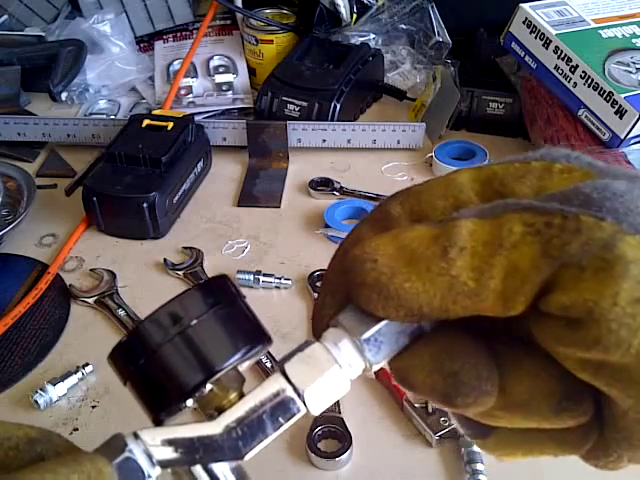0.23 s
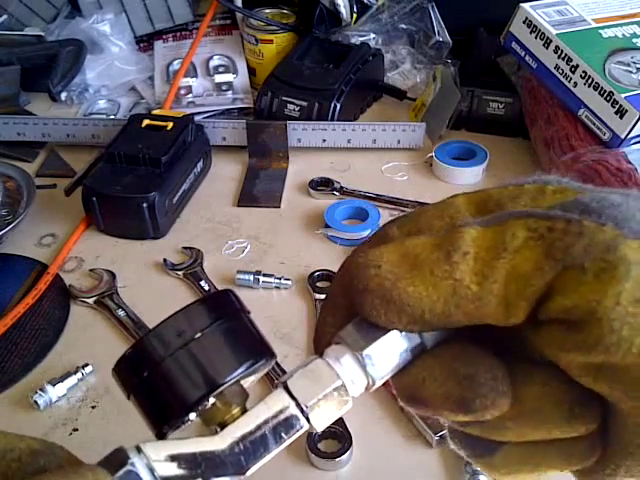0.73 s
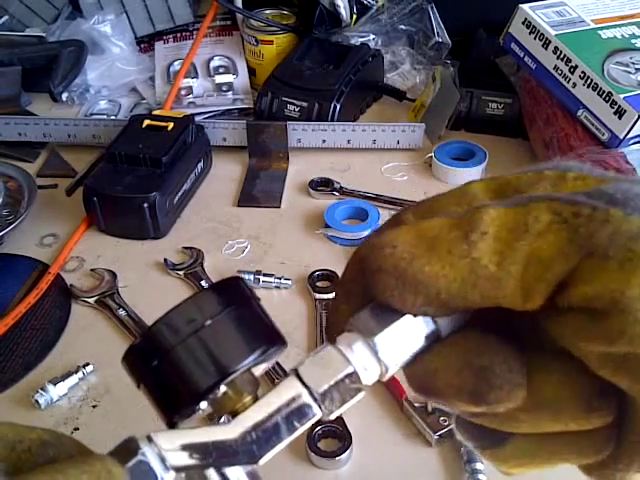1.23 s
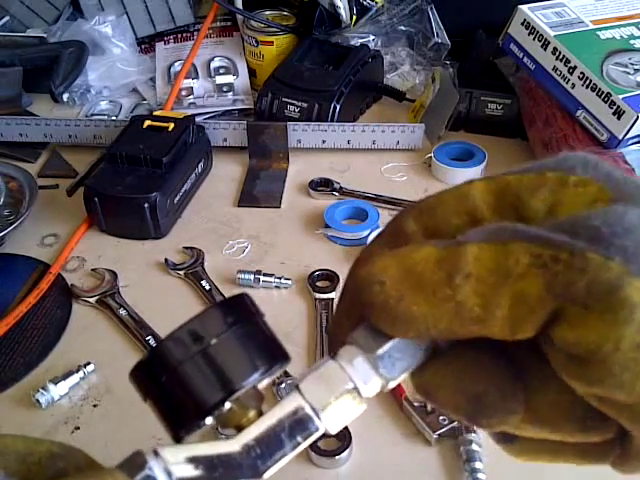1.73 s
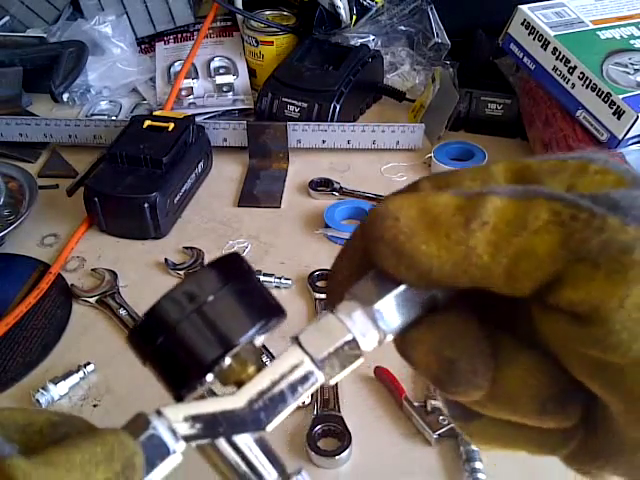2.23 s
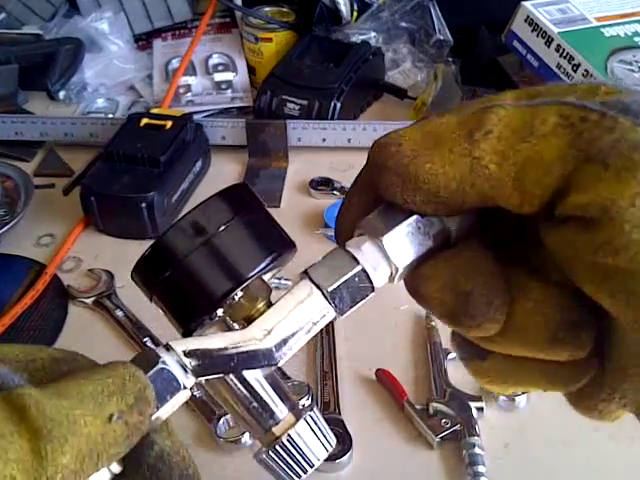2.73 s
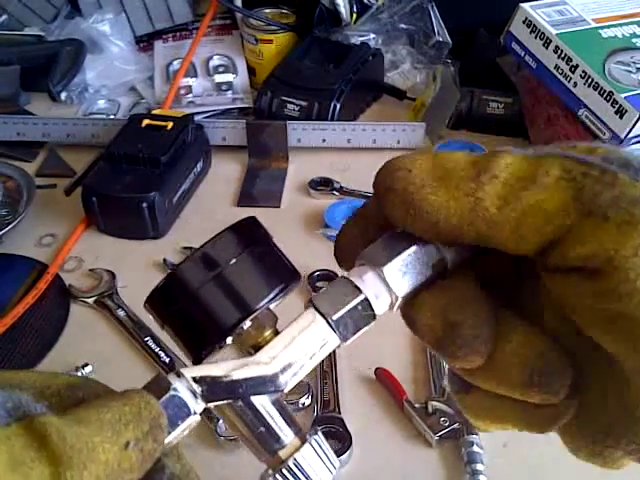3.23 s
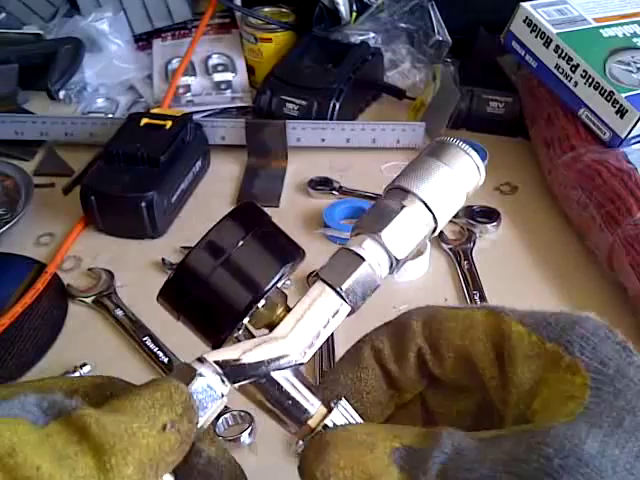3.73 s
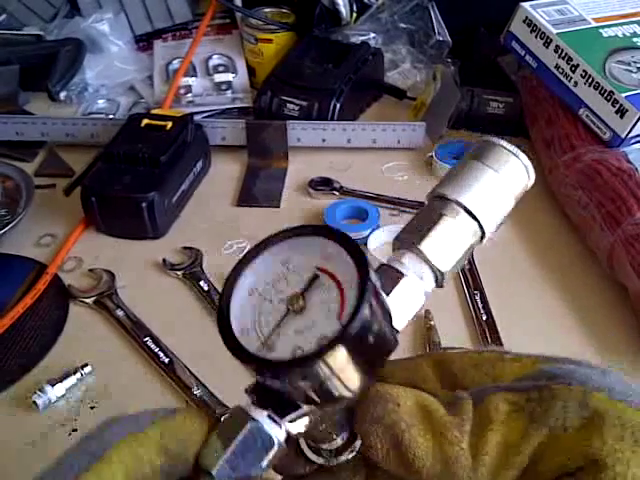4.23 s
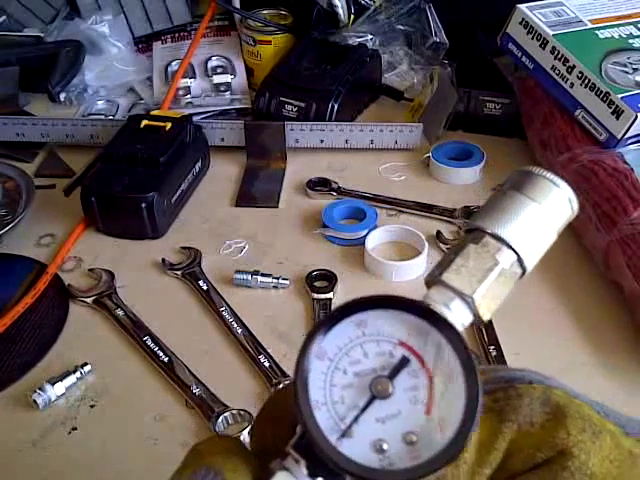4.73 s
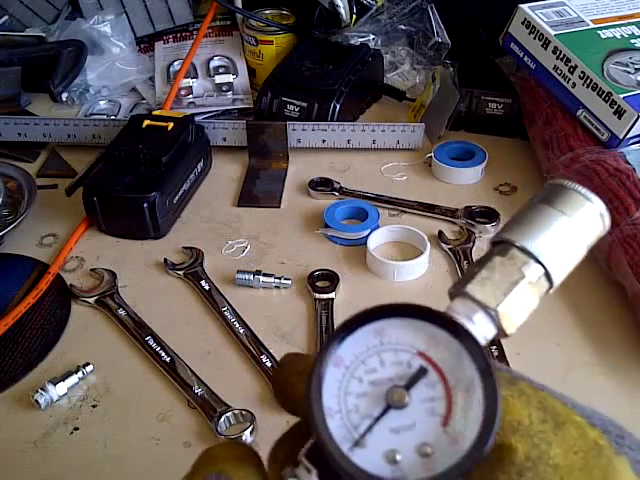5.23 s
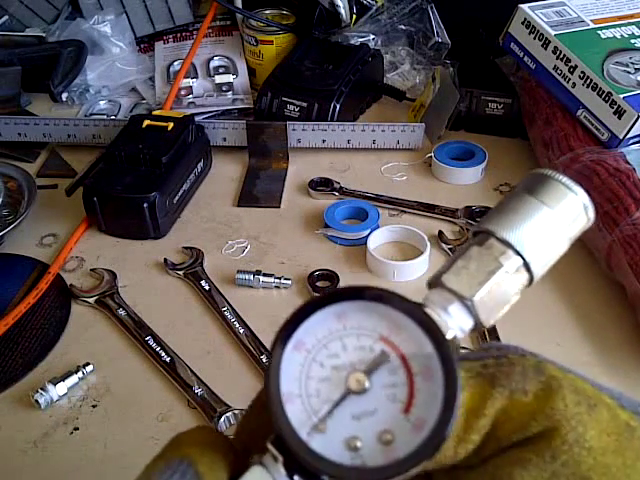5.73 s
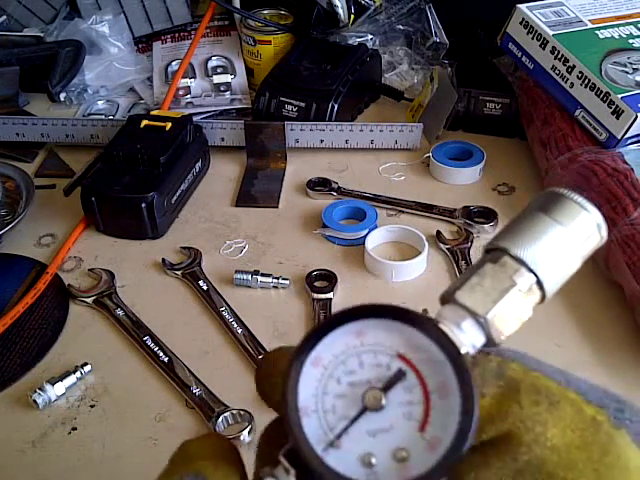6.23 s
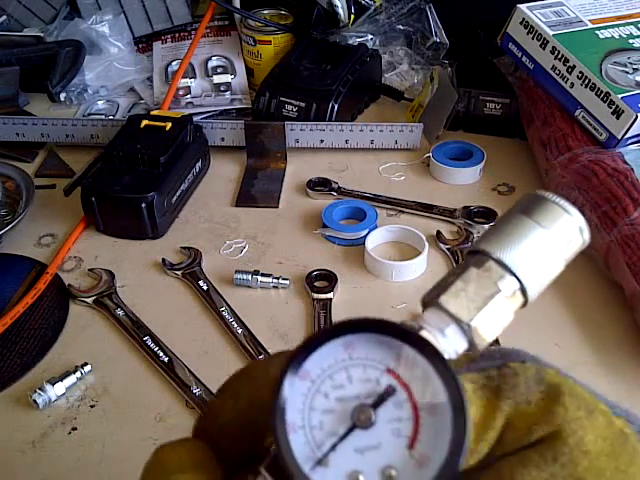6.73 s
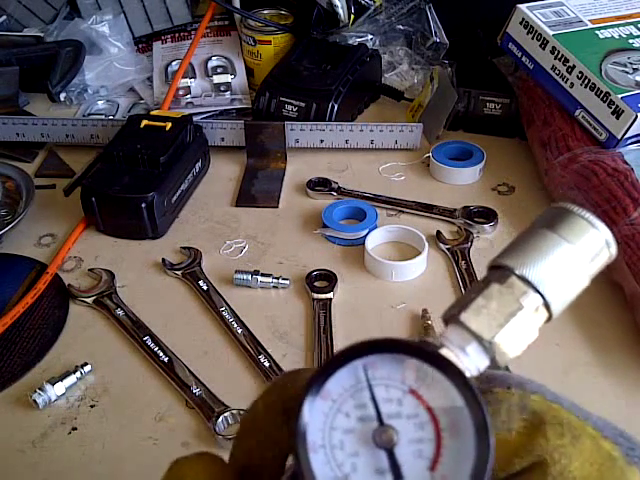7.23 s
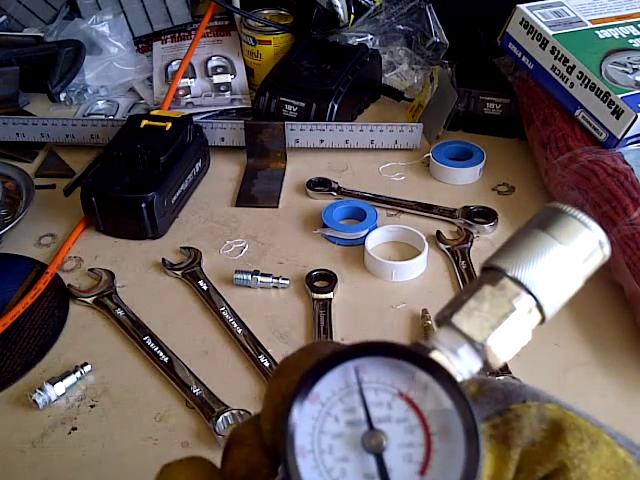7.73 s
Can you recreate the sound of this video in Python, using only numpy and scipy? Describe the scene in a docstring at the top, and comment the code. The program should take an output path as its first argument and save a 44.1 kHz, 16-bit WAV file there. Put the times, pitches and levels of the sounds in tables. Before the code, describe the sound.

Two short hissing spurts of air and soft handling bumps, then a small electric air compressor grunts awake and drones loudly and steadily.

```python
"""In a garage, quiet noise lies under everything and a first spurt of air from a hose fitting dies away.
After soft handling bumps comes a second spurt, hissing and hollow, that buffets the microphone and whistles faintly.
Then a small electric air compressor starts: the motor grunts on mains hum and spins up in a fifth of a second.
The piston pump drones steadily to the end: shaft orders, valve slaps and noise, all tied to one shaft angle.
Two more bumps sound under the drone, one about halfway and one near the end."""
import sys
import numpy as np
from scipy import signal
from scipy.fft import rfft, irfft, next_fast_len
from scipy.io import wavfile
from scipy.ndimage import uniform_filter1d, map_coordinates

SR = 44100
rng = np.random.default_rng(int(sys.argv[2]) if len(sys.argv) > 2 else 0)


def amp(db):
    return 10 ** (np.asarray(db, float) / 20)


def write(x):
    x = np.atleast_2d(x).T
    wavfile.write(sys.argv[1], SR, np.round(np.clip(x, -1, 1) * 32767).astype(np.int16))


N = 351918
T = np.arange(N) / SR
MAINS_RAD = 2 * np.pi * 60 * T  # phase of the 60 Hz mains


def along(points, hz):
    """Reads (f/Hz, value) points at any frequency, on a log axis."""
    f, value = np.transpose(points)
    return np.interp(np.log(hz + 1), np.log(f + 1), value)


def curves(rows):
    """One curve per column after the time; -120 outside, but a table ending after 7 s holds its last value."""
    s, *columns = np.transpose(rows)
    return [np.interp(T, s, c, left=-120, right=-120 if s[-1] < 7 else c[-1]) for c in columns]


def unit(x):
    """Scales to rms 1."""
    return x / np.sqrt(np.mean(x ** 2) + 1e-20)


def wobble(rate):
    """A smooth random curve with rate knots a second."""
    knots = rng.standard_normal(int(N * rate / SR) + 4)
    return map_coordinates(knots, [T * rate])


def filtered(x, response):
    """Multiplies the spectrum of x by a response of frequency."""
    m = next_fast_len(N + SR // 2)
    return irfft(rfft(x, m) * response(np.fft.rfftfreq(m, 1 / SR)), m)[:N]


def coloured(x, spectrum):
    """Shapes x by a table of levels over frequency, then scales it to rms 1."""
    return unit(filtered(x, lambda hz: amp(along(spectrum, hz))))


def noise(spectrum, patchy_db):
    """Coloured noise whose gain varies in random patches of time and frequency."""
    z = signal.stft(rng.standard_normal(N + 512), nperseg=512)[2]
    field = uniform_filter1d(rng.standard_normal(z.shape), 6, 0)
    field = uniform_filter1d(field, 12, 1)
    patched = signal.istft(z * amp(patchy_db * unit(field)), nperseg=512)[1][:N]
    return coloured(patched, spectrum)


def swells(s, hold, db, rise, fall):
    """Gain of events that each rise, hold and fall in straight lines; their powers add."""
    corners = np.cumsum(np.broadcast_arrays(s, rise, hold, fall), axis=0).T
    return np.sqrt(sum((amp(d) * np.interp(T, c, [0, 1, 1, 0])) ** 2 for c, d in zip(corners, db)))


def drifting(a, b, rate):
    """A slow random blend of two versions, as hands and microphone move."""
    angle = 1.36 * wobble(rate)
    return np.cos(angle) * a + np.sin(angle) * b


def garage(x, wet_db, t60):
    """Direct sound plus a dense dying echo, which ripples the spectrum finely."""
    tails = rng.standard_normal((2, SR // 4)) * amp(-60 * T[:SR // 4] / t60)
    echo = signal.fftconvolve(x[None], tails / np.linalg.norm(tails[0]), axes=1)[:, :N]
    return unit(x + amp(wet_db) * drifting(*echo, rate=0.803))


# the quiet of the garage: f/Hz, relative level/dB per Hz
QUIET_SPECTRUM = [(18, -35.5), (30, -3), (204, -3.5), (234, 1), (569, -12), (1080, -10), (4340, -26.5),
                  (4750, -23.5), (7000, -22.5), (9100, -64.5), (15400, -120)]


def quiet_garage():
    """Steady low-weighted noise, the bed under every other source."""
    return amp(-56.5) * noise(QUIET_SPECTRUM, patchy_db=1.1)


# soft handling bumps: t/s, note level/dB before the soft onset, f/Hz, note t60/s, tick level/dB before dulling
HANDLING_BUMPS = [(.303, -24, 171, 0.031, -23.5), (.588, -46, 300, .03, -37), (.653, -20, 150, .045, -27.5),
                  (.722, -28, 170, .045, -26), (.806, -29, 120, .05, -34), (.872, -22, 110, .05, -32),
                  (1.243, -19, 1110, .04, -41), (3.71, -23, 105, 0.14, -38), (3.744, -28, 90, .1, -42),
                  (7.062, -14, 226, 0.052, -7.5)]


def bumps():
    """Each soft contact is one damped note and a dull tick."""
    out, t = np.zeros(N + SR), T[:SR // 4]
    onset = 1 - np.exp(-t / 0.0028)
    for s, db, hz, t60, tick_db in HANDLING_BUMPS:
        note = amp(db - 60 * t / t60) * np.sin(2 * np.pi * hz * t)
        dull = uniform_filter1d(rng.standard_normal(len(t)), size=14)
        tick = dull * amp(tick_db - 60 * t / 0.059)
        out[round(s * SR):][:len(t)] += onset * (note + tick)
    return out[:N]


# air leaving the fitting: t/s, hold/s, closing/s, hiss level/dB, throat level/dB
AIR_SPURTS = [(-.05, .27, 0.07, -36, -34.5), (0.59, .005, 0.076, -42, -44.5), (0.581, .645, .012, -42, -44),
              (1.19, 0.038, 0.012, -44, -37)]
# bright hiss of the jet: f/Hz, relative level/dB per Hz
HISS_SPECTRUM = [(1120, -39), (1900, -9.5), (2180, -10.5), (2440, -6.5), (3700, -4.5), (4470, -6),
                 (4990, -1.5), (6240, -7.5), (7000, -3), (9100, -40.5), (15400, -120)]
# hollow throat of the fitting, whose colour the spin-up rush shares: f/Hz, relative level/dB per Hz
THROAT_SPECTRUM = [(30, -27), (150, -18), (300, -11), (410, -4), (550, -9), (700, -10), (950, -5.5),
                   (1220, -2), (1450, -4.5), (1750, -4.5), (2100, -17), (2700, -38.5)]


def spurts():
    """Escaping air: turbulent hiss echoing in the garage, and the hollow noise of the throat."""
    opening_s = 0.038
    s, hold, closing, hiss_db, throat_db = np.transpose(AIR_SPURTS)
    hiss = garage(noise(HISS_SPECTRUM, patchy_db=1.6), wet_db=-9, t60=0.089)
    hiss *= swells(s, hold, hiss_db, opening_s, closing) * amp(.7 * wobble(9))
    throat = noise(THROAT_SPECTRUM, patchy_db=1.2)
    throat *= swells(s, hold, throat_db, opening_s, closing) * amp(0.56 * wobble(25.4))
    return hiss + throat


# the fitting whistles: t/s, centre f/Hz, centre level/dB
WHISTLE_PATH = [(.93, 976, -75), (.97, 990, -48), (1.1, 992, -45), (1.19, 992, -40), (1.23, 1000, -86)]


def whistle():
    """One faint tone from the fitting, unsteady in pitch and strength."""
    hz, db = curves(WHISTLE_PATH)
    phase = 2 * np.pi * np.cumsum(hz + 15 * wobble(30)) / SR
    return amp(db) * (1 + .5 * wobble(60)) * np.sin(phase)


# air pushing on the microphone: t/s, hold/s, deep buffet level/dB, lighter flutter level/dB
AIR_GUSTS = [(.63, .2, -44, -42.5), (.89, 0.099, -42.5, -50), (1.005, 0.13, -33, -46),
             (1.17, .05, -41.5, -52), (1.304, .08, -44.5, -69)]
# the deep buffet: f/Hz, relative level/dB per Hz
BUFFET_SPECTRUM = [(25, -25), (55, -22), (90, -4.5), (122, -2.5), (150, -7), (190, -27), (260, -42)]
# the lighter flutter: f/Hz, relative level/dB per Hz
FLUTTER_SPECTRUM = [(30, -5), (60, -5), (120, -3.5), (220, 3), (350, -3), (500, -12), (800, -36.5)]


def buffeting():
    """Moving air at the microphone: lumpy low noise in two bands, swelling with each gust."""
    rise_s, fall_s = .025, .05
    s, hold, buffet_db, flutter_db = np.transpose(AIR_GUSTS)
    buffet = swells(s, hold, buffet_db, rise_s, fall_s) * amp(1.3 * wobble(28))
    buffet *= noise(BUFFET_SPECTRUM, patchy_db=0.3)
    flutter = swells(s, hold, flutter_db, rise_s, fall_s) * amp(3.9 * wobble(35))
    flutter *= noise(FLUTTER_SPECTRUM, patchy_db=1.0)
    return buffet + flutter


def shaft():
    """Speed (turns/s) and angle (rad): it leaves at switch-on, gains speed evenly and levels off."""
    switch_on_s, first_turns_per_s, gain_turns_per_s2 = 1.235, 14, 232
    full_turns_per_s, knee, last_crank_rad = 56.4545, 18, 1.32
    free = first_turns_per_s + gain_turns_per_s2 * (T - switch_on_s).clip(0)
    free = free * (T > switch_on_s)
    speed = free / (1 + (free / full_turns_per_s) ** knee) ** (1 / knee)
    # counted back from the crank angle at the end
    turn = 2 * np.pi * (np.cumsum(speed) - speed.sum()) / SR + last_crank_rad
    turn += 0.01 * wobble(4) + 0.0013 * wobble(30)
    # the shaft lurches while it is still short of full speed
    turn += .13 * (1 - speed / speed[-1]) * wobble(70)
    return speed, turn


# magnetic hum beating with the shaft: mains multiple, shaft order, level/dB at full speed
HUM_LINES = [(2, 0, -61.5), (2, 1, -60.5), (2, 3, -58.5), (2, 5, -52.5), (2, 6, -43.5), (6, 0, -50),
             (6, 1, -42.5)]


def hum(speed, turn):
    """Magnetic pull at mains multiples, shifted by shaft orders and growing with speed."""
    lines = sum(amp(db + 1.2 * wobble(4.0)) * np.cos(m * MAINS_RAD + k * turn) for m, k, db in HUM_LINES)
    return lines * speed / speed[-1]


# the labouring windings growl in surges: t/s, hold/s, level/dB rms
GRUNT_SURGES = [(1.24, 0.017, -19.5), (1.289, .002, -24), (1.314, 0.0027, -26), (1.366, 0.024, -25)]


def grunt():
    """The windings labour at switch-on: surges of a tone at six times mains."""
    gain = swells(*np.transpose(GRUNT_SURGES), rise=0.0052, fall=.02)
    return gain * np.sqrt(2) * np.cos(6 * MAINS_RAD)


# a dull rush while the shaft gathers speed: t/s, rise/s, hold/s, fall/s, level/dB
SPIN_UP_RUSH = (1.235, .03, .11, .05, -32.5)


def rush():
    """One swell of patchy, hollow noise during the spin-up."""
    s, rise, hold, fall, db = SPIN_UP_RUSH
    return swells([s], hold, [db], rise, fall) * noise(THROAT_SPECTRUM, patchy_db=4.5)


# valve slaps: f/Hz, relative level/dB per Hz
VALVE_SPECTRUM = [(1650, -60.5), (1780, 0.5), (2200, -1.5), (2750, 0.5), (3100, -1.5), (3600, -10.5),
                  (4700, -6), (5400, -10.5), (6200, -40)]


def valve_slaps(turn):
    """The valve slaps once a turn, a little early or late, and rings on in the garage."""
    turns = turn / (2 * np.pi) + .002 * wobble(5) + 0.0011 * wobble(40)
    slap = np.diff(np.floor(turns), prepend=0).clip(0)
    slap = slap * amp(1.2 * wobble(25))
    rings = rng.standard_normal((2, SR // 8)) * amp(-60 * T[:SR // 8] / 0.13)
    rung = signal.fftconvolve([slap], rings, axes=1)[:, :N]
    return coloured(drifting(*rung, rate=.3), VALVE_SPECTRUM)


# pump noise: f/Hz, relative level/dB per Hz
PUMP_SPECTRUM = [(30, -21), (150, -15), (330, -11), (560, -8), (700, -7.5), (1000, -13), (1300, -16.5),
                 (1900, -14.5), (2250, -16), (3300, -13), (4300, -19), (5300, -16.5), (5800, -22),
                 (7000, -25.5)]


def pump_air(turn):
    """Air rushes hardest on the compression stroke; the duller intake breath comes half a turn later."""
    air = garage(noise(PUMP_SPECTRUM, patchy_db=0.78), wet_db=-7.0, t60=.12)
    intake = filtered(air, lambda hz: 1 / (1 + (hz / 2000) ** 8))
    puff = 1 + 0.077 * np.cos(turn - 1.6) + 0.059 * np.cos(2 * turn + 0.64)
    breath = 1 + 0.12 * np.cos(turn + 1.7)
    return puff * (air - intake) + breath * intake


# resonances of the pump casing: f/Hz, width/Hz, boost/dB
CASING_RESONANCES = [(462, 26, 12), (1500, 140, 7), (1610, 150, 6.5), (2520, 43, 2), (2703, 160, 5),
                     (2996, 100, 2.5), (3970, 110, 6), (4670, 160, 4.5), (5060, 230, 3.5)]


def casing_rattle(turn):
    """Air and valve slaps ring the casing, whose resonances add power to what passes."""
    def casing(hz):
        peaks = sum(amp(2 * db) / (1 + ((hz - c) / (w / 2)) ** 2) for c, w, db in CASING_RESONANCES)
        return np.sqrt(1 + peaks)
    return unit(filtered(pump_air(turn) + amp(-7.5) * valve_slaps(turn), casing))


# one piston stroke heard through tank and walls: shaft order, relative level/dB at full speed
STROKE_ORDERS = [(1, -34), (2, -24), (3, -29.5), (4, -23.5), (5, -14), (6, -27.5), (7, -16.5), (8, 0),
                 (9, -8.5), (10, -2.5), (11, -29.5), (12, -14.5), (13, -11.5), (14, -23.5), (15, -26),
                 (16, -21.5), (17, -24.5), (18, -21), (19, -31.5), (20, -24), (21, -25.5), (22, -25),
                 (23, -29), (24, -31), (25, -25.5), (26, -25.5), (27, -22.5), (28, -21.5), (29, -26.5),
                 (30, -21)]


def drone(speed, turn):
    """Piston strokes as a sum of shaft orders, each with its own level and lag."""
    order, level = np.transpose(STROKE_ORDERS)
    # tank and walls stay put, so an order is as loud as the resonance it is passing
    resonance_hz = order * speed[-1]
    # the orders line up into one thump a turn; those below the tank's resonance come late
    lag = .75 + 1.95 * (order < 8.5)
    # above the tank's range the orders bunch loosely into a second knock
    knock = -2.8 * order + 1.38 * rng.standard_normal(len(order))
    lag = np.where(order > 14.5, knock, lag)
    # short of full speed the orders have not yet fallen into step
    astray = 7 * rng.standard_normal(len(order))
    short = np.sqrt(abs(1 - speed / speed[-1]))
    out = np.zeros(N)
    for k, late, off in zip(order, lag, astray):
        db = np.interp(k * speed, resonance_hz, level) + 0.37 * wobble(6)
        out += amp(db) * np.cos(k * turn - late - off * short)
    return out


# the pump takes up its load: t/s, stroke gain/dB, air and metal noise level/dB
PUMP_LOAD = [(1.235, -71, -79), (1.25, -34, -35), (1.3, -29.5, -45), (1.345, -23.5, -42.5),
             (1.36, -22, -34), (1.4, -21.5, -34), (1.435, -15.8, -30), (1.7, -15.5, -28.5),
             (7.98, -15.5, -29)]


def compressor():
    """Motor and pump together, tied to one shaft and growing as the load comes on."""
    stroke_db, noise_db = curves(PUMP_LOAD)
    speed, turn = shaft()
    motor = hum(speed, turn) + grunt() + rush()
    pump = amp(stroke_db) * drone(speed, turn) + amp(noise_db) * casing_rattle(turn)
    return motor + pump


def scene():
    """All sources over the garage's quiet, at one microphone."""
    air = spurts() + whistle() + buffeting()
    return (quiet_garage() + bumps() + air + compressor())[None]


def low_pass(x):
    """Removes everything above the highest recorded frequency."""
    return signal.sosfilt(signal.butter(12, 10300, fs=SR, output="sos"), x)


def record(dry):
    """A low sampling rate: a steep roll-off, and a faint mirror image of the treble above it."""
    sample_hz = 16000
    # f/Hz, gain/dB of the mirror image
    mirror_gain = [(8250, -94.0), (8450, -23.5), (9000, -19.5), (9600, -22.0), (10100, -39.5), (10300, -100)]

    def roll_off(hz):
        return (hz < 7650) / np.sqrt(1 + (hz / 6700) ** 24) / (1 + (hz / 7250) ** 40)
    kept = filtered(dry[0], roll_off)
    folded = dry[0] * np.cos(2 * np.pi * sample_hz * T)
    mirror = filtered(folded, lambda hz: amp(along(mirror_gain, hz)))
    return low_pass((kept + mirror)[None])


dry = scene()
out = record(dry)
write(out)
```